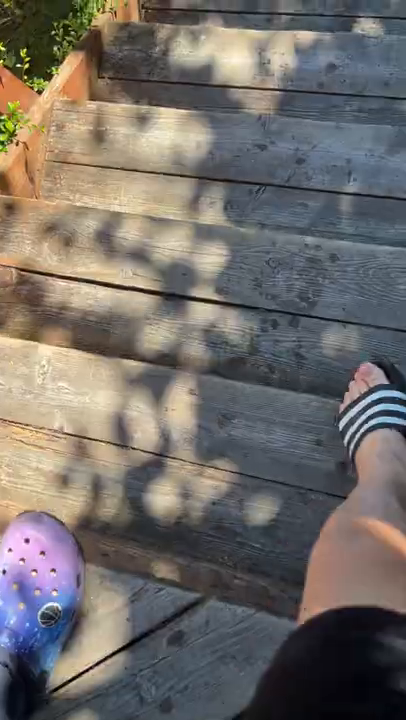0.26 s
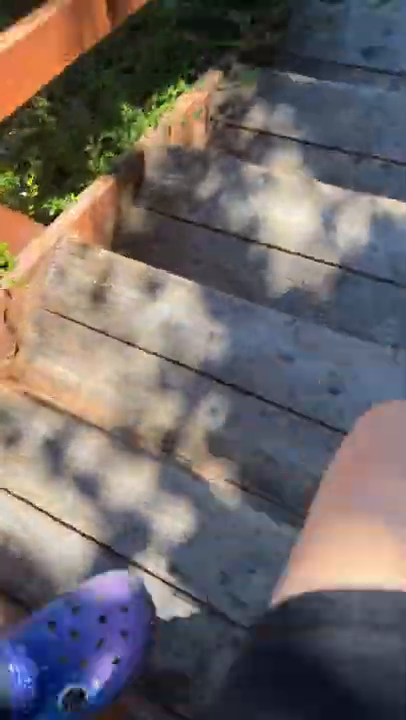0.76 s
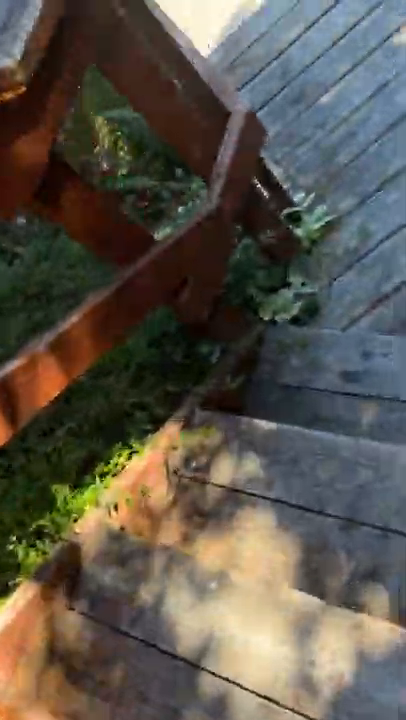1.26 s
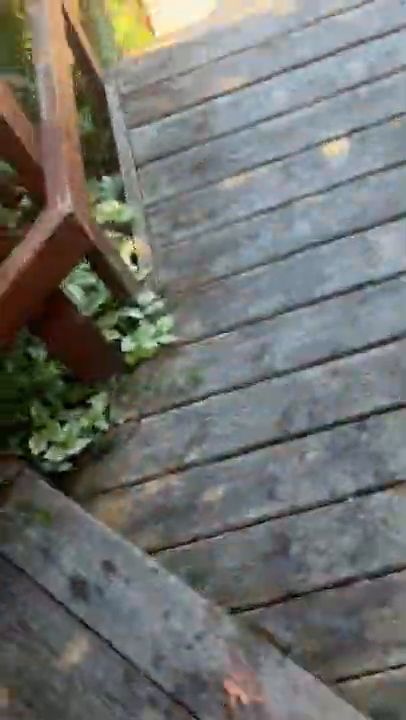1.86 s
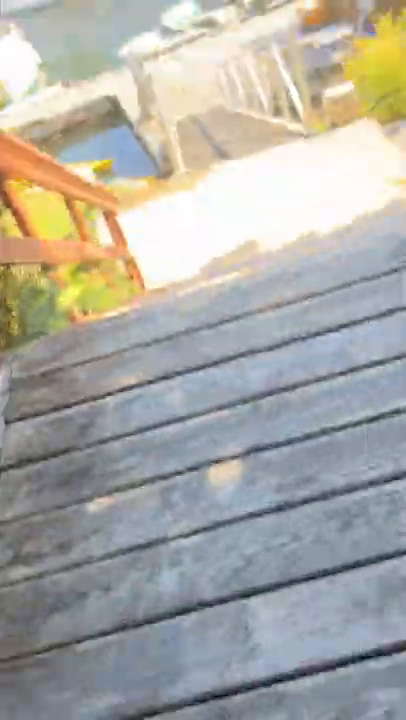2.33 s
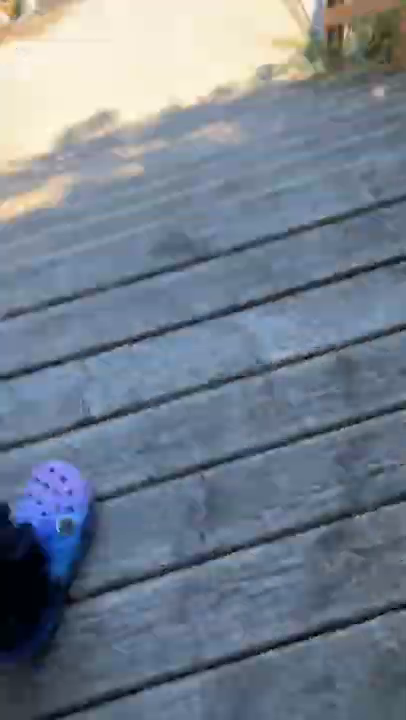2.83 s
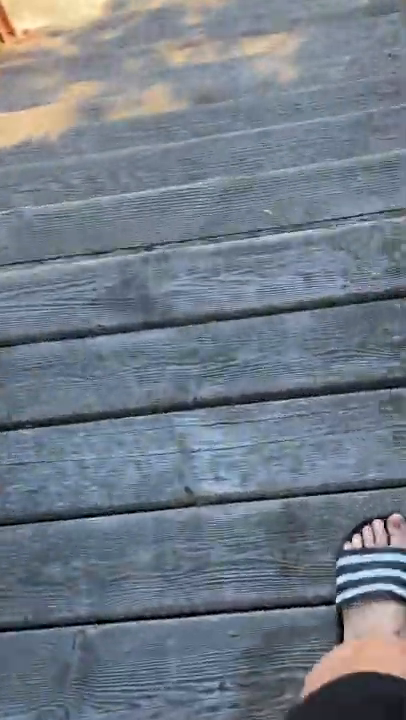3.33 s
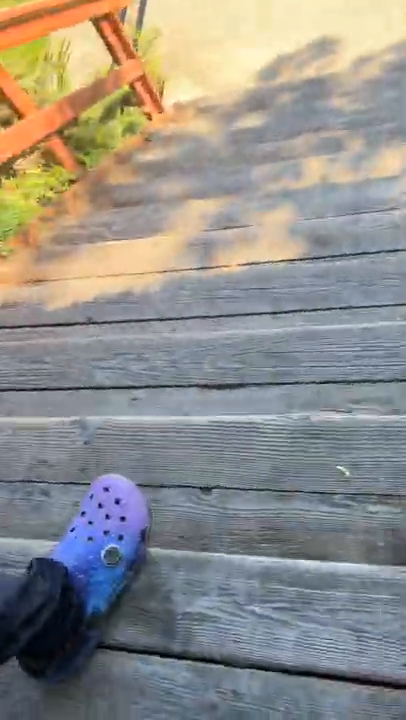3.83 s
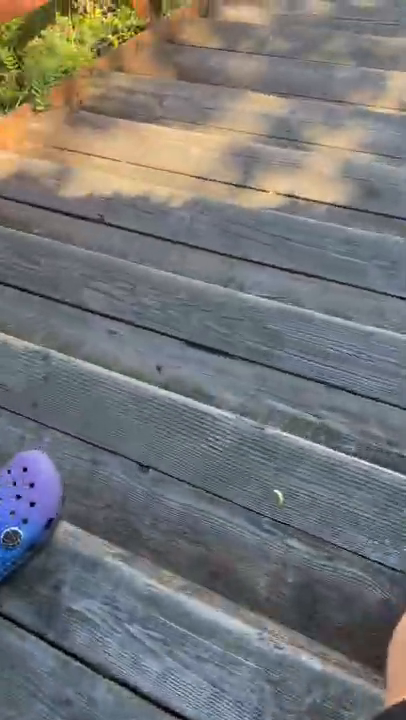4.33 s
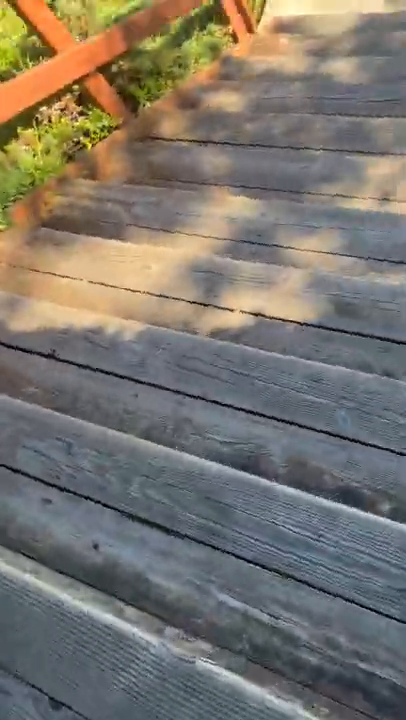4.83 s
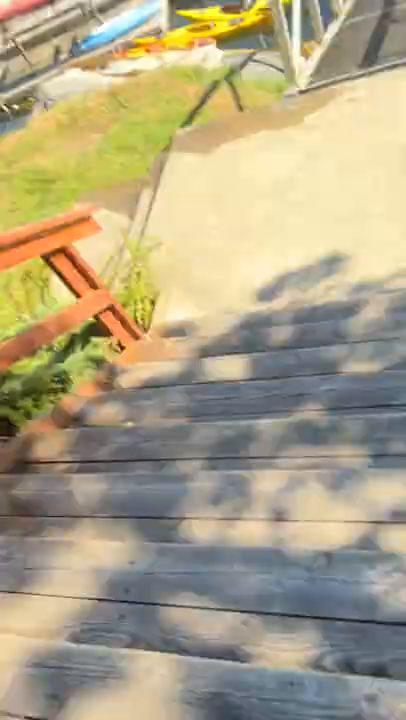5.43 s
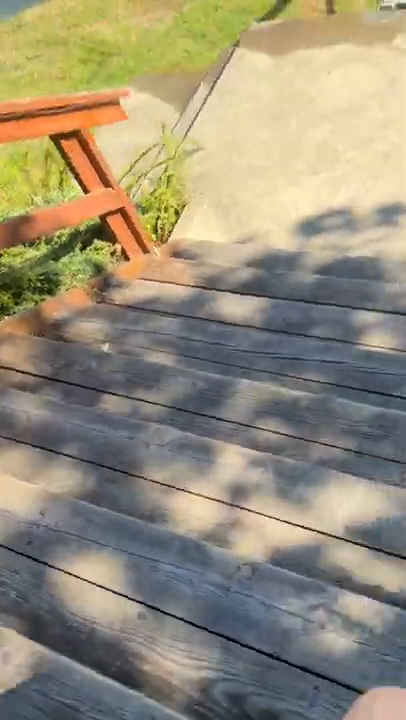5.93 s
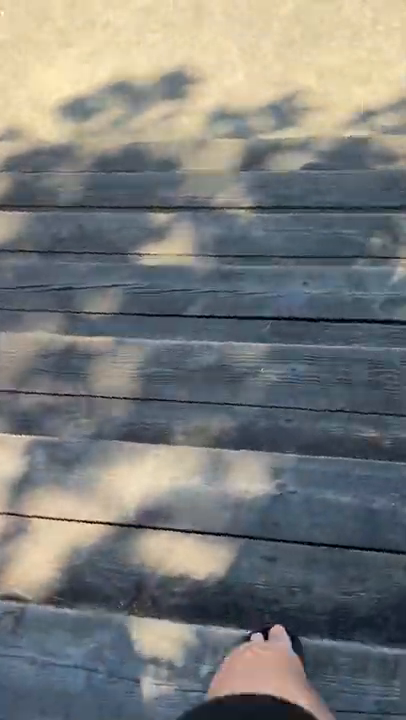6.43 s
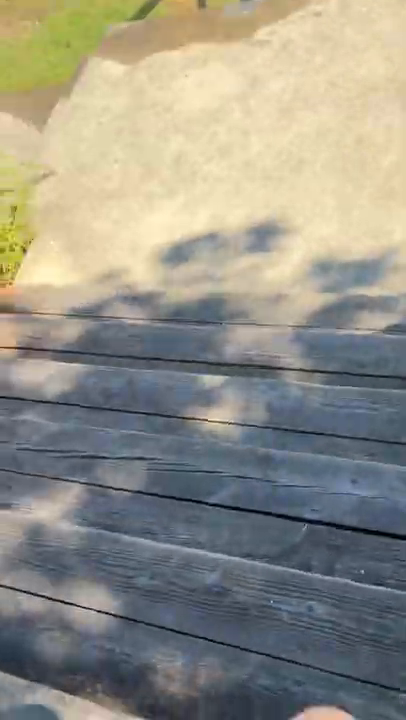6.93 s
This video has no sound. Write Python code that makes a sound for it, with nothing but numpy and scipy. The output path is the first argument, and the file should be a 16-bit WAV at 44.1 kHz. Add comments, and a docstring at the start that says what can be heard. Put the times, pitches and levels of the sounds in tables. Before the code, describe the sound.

Close hand-held pickup of irregular footsteps on damped planks: toe, ball, then full landing, each a short knock and slap with a low thump beneath. Firm, gritty stair steps come first, then duller, lighter deck steps with scraping soles and more clothing rustle, a sparser moment, and finally hollow steps on a bouncier lower flight. The garden around is almost silent, with only a faint dull tail.

```python
"""Footsteps on wooden stairs, outdoors: two people in foam clogs and slide sandals go down one flight,
over a deck and down a second. A step rolls from toe to ball to full landing and settles; each touch rings
damped plank modes (knock) and face modes (slap), with a grit burst. Low frame modes boom under the weight
and rock on, longer in the springy lower flight. Filtered noise makes sole scuffs, clothes that rustle
close to the hand-held phone, and a quiet garden."""
import sys
import numpy as np
from scipy import signal
from scipy.fft import rfft, irfft, next_fast_len
from scipy.io import wavfile

SR = 44100
rng = np.random.default_rng(int(sys.argv[2]) if len(sys.argv) > 2 else 0)


def unload_audio(sound):
    """Save the sound as a 16-bit wav file, at the path given as the first command line argument."""
    columns = np.transpose(np.atleast_2d(sound))
    # keep every value between -1 and 1, then stretch to whole-number steps
    steps = np.round(np.clip(columns, -1, 1) * 32767)
    wavfile.write(sys.argv[1], SR, steps.astype(np.int16))


N = 317079
TIME_S = np.arange(N) / SR
AGE_S = np.arange(SR // 2) / SR  # time since a blow
LOWER_FLIGHT_S = 4.2  # start of the second flight

# Colour of slaps and sole rasp. Each row: frequency in Hz, gain in dB.
SLAP_COLOUR = [(400, -4.5), (700, -1), (1000, 1.5), (1500, 1.5), (2200, -3), (3300, -13), (5000, -24.5),
               (9000, -51)]
# Colour of grit and sole hiss. Each row: frequency in Hz, gain in dB.
GRIT_COLOUR = [(1200, -23), (3000, -3.5), (7500, -2.5), (10000, -7.5), (13000, -6.5), (16000, -11.5)]
# Rolling steps. Each row: landing in s, toe lead in s, ball lead in s, boom lag in s, knock pitch in Hz,
# knock in dB, slap in dB, grit in dB (before a common gain), toe slap in dB, ball knock in dB,
# boom pitch in Hz, boom in dB.
ROLLING_STEPS = [(0.398, 0.068, .028, -0.0057, 340, -16, -23, -41.5, -42, -21, 97, -24.5),
                 (0.622, 0.027, 0.017, 0.0039, 328, -10.5, -22, -26.5, -43, -33, 77, -23.5),
                 (0.951, 0.051, 0.027, 0.011, 306, -13.5, -21, -34.5, -40.5, -34, 77.7, -22),
                 (1.219, 0.032, 0.03, 0.0012, 390, -11.5, -22, -35.5, -40.5, -58, 87.7, -19.5),
                 (1.354, 0.047, 0.0089, 0.011, 251, -25, -43, -42.5, -46, -42, 95, -26.5),
                 (1.658, 0.1, 0.064, -0.016, 248, -21, -40, -48.5, -39.5, -29, 103.8, -24.5),
                 (2.009, 0.082, 0.056, .001, 217, -19, -33.5, -47.5, -38, -21, 123, -29),
                 (2.132, 0.02, 0.0091, 0.013, 280, -23.5, -32.5, -45, -42.5, -41, 87.2, -23),
                 (2.357, .069, .058, .000, 278, -22, -38.5, -49, -42, -21.5, 91, -34.5),
                 (2.459, .023, .020, .001, 283, -19.5, -29, -38, -30, -26.5, 119, -29),
                 (2.754, .021, .018, -.012, 210, -27, -42.5, -46.5, -35, -27, 127.5, -29.5),
                 (3.301, 0.079, 0.021, -0.006, 274, -23.5, -30.5, -38, -39, -35, 89.5, -25),
                 (3.865, 0.023, 0.012, 0.024, 271, -31.5, -36, -59, -55.5, -53.5, 69.7, -34),
                 (4.507, .086, .036, 0.0136, 392, -28, -45, -52.5, -45, -29.5, 65.1, -25),
                 (4.998, 0.049, .035, 0.025, 330, -22, -37, -57.5, -43, -33, 76.2, -25.5),
                 (5.224, .011, 0.006, 0.017, 417, -35.5, -35.5, -49, -41.5, -64, 68.4, -27.5),
                 (5.434, 0.081, 0.042, -0.021, 480, -24.5, -39, -60, -39.5, -25, 77, -27),
                 (5.864, .031, 0.016, 0.005, 236, -17.5, -32, -45, -36.5, -42, 93.7, -21),
                 (6.392, 0.068, 0.037, 0.019, 483, -19, -27, -44, -38, -28.5, 78, -22),
                 (6.848, .038, 0.037, .002, 250, -17, -30.5, -39.5, -40.5, -49, 97.7, -22.5)]
# Lone flat touches and dull thumps of the frame. Each row: start in s, knock in dB, boom in dB.
TOUCHES_AND_THUMPS = [(0.006, -37, -44), (1.138, -66, -29.5), (2.828, -31, -32.5), (2.939, -37, -50),
                      (3.11, -40.5, -54), (3.682, -25.5, -36), (5.573, -63, -33)]


def undb(db):
    """Decibels to gain."""
    return 10 ** (np.asarray(db) / 20)


def unit(x, span=slice(None)):
    """Each row scaled to rms 1 over a span of samples."""
    return x / np.sqrt(np.mean(x[..., span] ** 2, axis=-1, keepdims=True))


def blow(x):
    """A blow scaled to rms 1 over its first 20 ms."""
    return unit(x, slice(SR // 50))


def shape(points, size):
    """Gain of a (Hz, dB) curve at the bins of a transform."""
    hz, db = np.transpose(points)
    bins_hz = np.fft.rfftfreq(size, 1 / SR)
    return undb(np.interp(np.log(bins_hz + 1), np.log(hz), db))


def colour(x, points):
    """Causal filter with a (Hz, dB) response, built from its folded cepstrum."""
    size = 4096
    cepstrum = irfft(np.log(shape(points, size)))
    fold = np.r_[1, np.full(size // 2 - 1, 2), 1, np.zeros(size // 2 - 1)]
    impulse = irfft(np.exp(rfft(cepstrum * fold)))
    return signal.fftconvolve(x, impulse[None], axes=1)[:, :x.shape[1]]


def noise(size):
    """Two rows of noise: what the ports share and what differs between them."""
    return rng.standard_normal((2, size))


def walk(rate_hz, size):
    """A smooth random wander with a spread near 1."""
    knots = rng.standard_normal(int(size / SR * rate_hz) + 2)
    return np.interp(np.arange(size) / SR * rate_hz, np.arange(len(knots)), knots)


def fade(t60_s):
    """Exponential decay after a blow."""
    return np.exp(-np.log(1000) * AGE_S / t60_s)


def add(track, start_s, sound):
    """Mix a sound into the track at a time."""
    start = max(int(start_s * SR), 0)
    part = sound[:, :max(N - start, 0)]
    track[:, start:start + part.shape[1]] += part


def ring(hz, db, t60_s, rise_cycles):
    """Damped modes; slow bending waves make the low ones swell later than the high ones."""
    age_s = AGE_S[AGE_S < t60_s.max()]
    cycles = hz[:, None] * age_s
    swell = 1 - np.exp(-(cycles / rise_cycles) ** 2)
    waves = swell * np.exp(2j * np.pi * cycles - np.log(1000) * age_s / t60_s[:, None])
    phases = np.exp(2j * np.pi * rng.random((2, len(hz))))
    sound = ((undb(db) * phases) @ waves).imag
    return np.pad(sound, ((0, 0), (0, len(AGE_S) - len(age_s))))


def wood_t60(hz, at_1khz_s, slope):
    """Wood damps its high modes sooner."""
    return at_1khz_s * (hz / 1000) ** -slope


def scatter(lo_hz, hi_hz, count):
    """Random frequencies, one in each equal step of pitch."""
    return lo_hz * (hi_hz / lo_hz) ** ((np.arange(count) + rng.random(count)) / count)


def flight(s):
    """How the boards underfoot answer: the lower flight is springier and smoother."""
    # Each: settling knock in dB re landing, dB per rocking, sole rasp and sole hiss in dB before common gains.
    upper = (-25, -21.5, -47, -54)
    lower = (-10.5, -8, -48, -60.5)
    return lower if s > LOWER_FLIGHT_S else upper


def light_touch(s, pitch_hz, knock_db):
    """A light touch: slap and grit follow its knock, at less than dB for dB."""
    gain_db = 0.69 * (knock_db + 27.5)
    return s, pitch_hz, knock_db, -40 + gain_db, -51.5 + gain_db


def touches():
    """Every meeting of sole and plank, as (s, pitch Hz, knock dB, slap dB, grit dB before a common gain)."""
    for (s, toe_lead_s, ball_lead_s, _, pitch_hz, knock_db, slap_db, grit_db,
         toe_db, ball_db, _, _) in ROLLING_STEPS:
        # the toe lands bright however hard the step: its slap sets its knock and grit
        yield s - toe_lead_s, pitch_hz, toe_db + 3.5, toe_db, toe_db - 17
        yield light_touch(s - ball_lead_s, pitch_hz, ball_db)
        yield s, pitch_hz, knock_db, slap_db, grit_db
        # the sole flattens with a second, dull knock
        settle_db = knock_db + flight(s)[0]
        yield s + 0.036, pitch_hz, settle_db, settle_db - 20.5, settle_db - 32
    for s, knock_db, _ in TOUCHES_AND_THUMPS:
        yield s, 310, knock_db, knock_db - 9, knock_db - 22.5


def loads(count=3, rock_s=0.086, rock_pitch=0.87):
    """Weight comes onto the ball, then the whole foot, and the frame rocks: (s, pitch Hz, dB)."""
    for s, _, ball_lead_s, lag_s, _, knock_db, _, _, _, ball_db, pitch_hz, boom_db in ROLLING_STEPS:
        # the early boom drops by a share of how much softer the ball knocks, and is capped against it
        early_db = boom_db + 0.5 + 0.44 * (ball_db - knock_db)
        yield s - ball_lead_s - 0.0142, 99.1, min(early_db, ball_db + 2.5)
        for k in range(count):
            yield s + lag_s + k * rock_s, pitch_hz * rock_pitch ** k, boom_db + k * flight(s)[1]
    for s, _, boom_db in TOUCHES_AND_THUMPS:
        yield s, 68.6, boom_db


def rubs(after_s=0.025):
    """A sole rubs through its roll and just after, and sometimes drags or slaps briefly: (s, s, dB, dB)."""
    # Each row: start in s, length in s, rasp in dB, grit hiss in dB, both before common gains.
    drags_and_slaps = [(1.296, 0.044, -57, -45.5), (1.571, .1, -46, -44), (1.934, .022, -39.5, -47.5),
                       (2.135, 0.1, -46, -51), (2.436, 0.033, -34.5, -49), (2.762, 0.094, -39.5, -43.5),
                       (3.213, 0.082, -56, -44.5), (3.682, 0.058, -41, -44.5), (4.435, 0.031, -42.5, -57.5),
                       (5.25, .12, -51, -58.5), (6.412, 0.14, -51.5, -55.5), (6.883, 0.0256, -31.5, -59),
                       (6.944, 0.11, -49.5, -59)]
    rolls = [(s - toe_lead_s, toe_lead_s + after_s, *flight(s)[2:]) for s, toe_lead_s, *_ in ROLLING_STEPS]
    return rolls + drags_and_slaps


def tick(t60_s, tail_db, tail_t60_s):
    """Grit cracks under a sole, with a faint crunch after it."""
    envelope = fade(t60_s) + undb(tail_db) * fade(tail_t60_s)
    return blow(colour(noise(len(AGE_S)) * envelope, GRIT_COLOUR))


def crumb():
    """A tiny click of sand or strap, with a colour of its own."""
    hz = scatter(3000, 9000, count=1) * scatter(0.81, 2.5, count=18)
    return blow(ring(hz, np.zeros(len(hz)), np.full(len(hz), 0.018), rise_cycles=3.4))


def clack(tilt_db_per_octave=0, spread_db=2, tail_db=-17, tail_t60_s=0.054):
    """The crowded cross-grain modes of a plank's face, and their scatter into the boards around it."""
    hz = scatter(654.8, 5500, count=56)
    points_hz, points_db = np.transpose(SLAP_COLOUR)
    db = np.interp(np.log(hz), np.log(points_hz), points_db)
    db = db + 10 * np.log10(hz / hz[0])  # higher modes stand for wider bands
    db = db + tilt_db_per_octave * np.log2(hz / hz[0])
    db = db + spread_db * rng.standard_normal(len(hz))
    face = blow(ring(hz, db, wood_t60(hz, at_1khz_s=0.054, slope=0.22), rise_cycles=0.29))
    tail = blow(colour(noise(len(AGE_S)) * fade(tail_t60_s), SLAP_COLOUR))
    return face + undb(tail_db) * tail


def background(garden_db=-58, rumble_db=-54):
    """Quiet garden air, and a low rumble, as wandering filtered noise."""
    # Each row: frequency in Hz, gain in dB.
    garden_colour = [(20, -21), (60, -4.5), (200, -10), (400, -16), (700, -34), (1500, -27.5),
                     (3000, -39.5), (8000, -43), (13000, -44.5), (16000, -37.5)]
    rumble_colour = [(25, -22.5), (65, -5.0), (110, -6.5), (200, -21.5), (2000, -99)]
    air = unit(colour(noise(N), garden_colour)) * undb(garden_db + 0.82 * walk(3, N))
    rumble = unit(colour(noise(N), rumble_colour)) * undb(rumble_db + 2.5 * walk(21, N))
    return air + rumble


def clothes(gain_db=5, crinkle_db=3.5, stir_db=3.2):
    """Fabric rubs unevenly as the legs swing; its dull and its bright parts stir separately."""
    # Each row: frequency in Hz, gain in dB.
    rustle_colour = [(200, -14), (500, 4.5), (1400, 1), (3000, -7.5), (5500, -9.5), (10000, -13.5),
                     (13000, -8.5), (16000, -18.5)]
    # Each row: time in s, rustle level in dB before gain_db.
    swing = [(0.0, -65.5), (1.98, -61.5), (2.34, -59.5), (2.46, -64), (3.8, -68), (4.12, -81.5),
             (4.64, -72.5), (5.04, -78.5), (5.35, -69.5), (6.65, -67), (7.19, -70.5)]
    cloth = unit(colour(noise(N), rustle_colour))
    dull = signal.sosfilt(signal.butter(1, 2500, fs=SR, output="sos"), cloth)
    folds = np.zeros((2, N))
    for part in (dull, cloth - dull):
        folds += part * undb(crinkle_db * walk(170, N) + stir_db * walk(15, N))
    return folds * undb(np.interp(TIME_S, *np.transpose(swing)) + gain_db)


def surroundings(x, t60_s=0.35, wet_db=-21):
    """Rails, treads and the space under the deck scatter a faint, dull tail."""
    tail = noise(len(AGE_S)) * fade(t60_s) * (1 - np.exp(-AGE_S / 0.026))
    tail = tail / np.sqrt(np.sum(tail ** 2) / 2)
    tail = colour(tail, [(60, 8.5), (200, 6), (600, -5), (2000, 1.0), (6000, 4.5), (15000, 1.5)])
    return undb(wet_db) * signal.fftconvolve(x[:1], tail, axes=1)[:, :N]


def scuffs(catch_db=5, catches_per_s=300, press_db=1.5, presses_per_s=55, rasp_gain_db=-1, hiss_gain_db=-2):
    """Soles catch and slip on the weathered grain; loose sandals snap against the foot."""
    # Each row: frequency in Hz, gain in dB.
    groan_colour = [(90, -20.5), (280, -4.5), (500, -1), (1500, -41)]
    # Sandal and strap snaps. Each row: start in s, level in dB before a common gain.
    snaps = [(0.989, -37), (3.424, -48), (3.995, -44), (5.944, -40.5), (6.139, -48), (6.456, -42),
             (6.989, -40.5)]
    out = np.zeros((2, N))
    for s, length_s, rasp_db, hiss_db in rubs():
        size = int(np.clip(length_s, 0.01, 0.4) * SR)
        wander_db = catch_db * walk(catches_per_s, size) + press_db * walk(presses_per_s, size)
        grip = signal.windows.tukey(size, 0.5) * undb(wander_db)
        rasp = unit(colour(noise(size) * grip, SLAP_COLOUR))
        hiss = unit(colour(noise(size) * grip, GRIT_COLOUR))
        groan = unit(colour(noise(size) * grip, groan_colour))
        add(out, s, undb(rasp_db + rasp_gain_db) * (rasp + 1.45 * groan))
        add(out, s, undb(hiss_db + hiss_gain_db) * hiss)
    for s, db in snaps:
        snap = crumb() + tick(t60_s=0.031, tail_db=-20.5, tail_t60_s=0.07) + 0.5 * clack()
        add(out, s, undb(db - 10.5) * snap)
    return out


def sole_noises(lead_s=0.029, brush_db=-19, settle_db=-19, crumb_db=-11):
    """A sole brushes the wood just before it lands; as it flattens, the plank ticks and sand shifts."""
    out = np.zeros((2, N))
    swell = np.linspace(0, 1, int(lead_s * SR))
    for s, _, _, slap_db, grit_db in touches():
        brush = unit(colour(noise(len(swell)), SLAP_COLOUR)) * swell
        add(out, s - lead_s, undb(slap_db + brush_db) * brush)
        add(out, s + rng.uniform(0.006, 0.035), undb(slap_db + settle_db) * clack())
        for wait_s in rng.uniform(0, 0.031, size=2):
            add(out, s + wait_s, undb(min(grit_db, -42) + crumb_db) * crumb())
    return out


def thuds(reference_hz=74):
    """The frame booms as it takes a walker's weight; the deeper the span, the longer it rings."""
    # Joist and stringer modes. Each row: multiple of the pitch, level in dB, t60 in s at reference_hz.
    frame_modes = [(0.698, -4.5, 0.37), (0.998, -0.5, 0.32), (1.42, -4.5, 0.19), (1.9, -5.5, 0.14)]
    out = np.zeros((2, N))
    ratio, db, t60_s = np.transpose(frame_modes)
    for s, pitch_hz, level_db in loads():
        boom = ring(pitch_hz * ratio, db, t60_s * reference_hz / pitch_hz, rise_cycles=0.6)
        add(out, s, undb(level_db) * unit(boom, slice(SR // 25)))  # rms over the first 40 ms
    return out


def contacts(focus_db_per_octave=7, detune=0.09, grit_gain_db=-1, tread_hz=850, tread_db=3.5):
    """A touch rings the plank underfoot and its neighbour; the spot and the sole decide which modes lead."""
    # Bending modes of a plank, in Hz before detuning.
    plank_hz = np.array([147, 191.4, 238.4, 291.4, 352.9, 432.4, 522.6, 587.2, 696.7, 832, 1036])
    out = np.zeros((2, N))
    for s, pitch_hz, knock_db, slap_db, grit_db in touches():
        hz = (plank_hz * np.exp(detune * rng.standard_normal((2, len(plank_hz))))).ravel()
        modes_db = -focus_db_per_octave * abs(np.log2(hz / pitch_hz))
        if s > LOWER_FLIGHT_S:  # these treads ring higher and hollower
            modes_db = modes_db + tread_db * np.exp(-(np.log2(hz / tread_hz) / 0.5) ** 2)
        knock = blow(ring(hz, modes_db, wood_t60(hz, at_1khz_s=0.055, slope=0.62), rise_cycles=0.93))
        # a gritty landing is brighter
        slap = clack(tilt_db_per_octave=0.34 * (grit_db - slap_db + 12.5))
        grit = tick(t60_s=0.037, tail_db=-14.5, tail_t60_s=0.084)
        add(out, s, undb(knock_db) * knock + undb(slap_db) * slap + undb(grit_db + grit_gain_db) * grit)
    return out


def scene(port_lag_s=0.000149):
    """All sounds reach two ports; the left port lags the right by a fixed time for every sound."""
    # Sound that differs between the ports. Each row: frequency in Hz, level in dB re the common sound.
    diffuse = [(60, -14.5), (300, -14.5), (600, -4), (1200, -2), (5500, 2), (7500, -1.5), (9500, -26.5),
               (16000, -25)]
    # Each row: frequency in Hz, left minus right in dB.
    port_balance = [(60, -0.5), (200, -1), (700, -4), (1300, -2), (4400, 2.5), (15000, -0.5)]
    steps = contacts() + thuds() + sole_noises() + scuffs()
    mix = steps + surroundings(steps) + clothes() + background()
    size = next_fast_len(N + SR // 10)
    common, apart = rfft(mix, size)
    share = shape(diffuse, size)
    tilt = np.sqrt(shape(port_balance, size))  # half of the balance for each port
    lag = np.exp(-2j * np.pi * np.fft.rfftfreq(size, 1 / SR) * port_lag_s)
    left = (common + share * apart) * tilt * lag
    right = (common - share * apart) / tilt
    return irfft(np.array([left, right]) / np.sqrt(1 + share ** 2), size)[:, :N]


def record(dry, bass_hz=40, top_hz=15900):
    """The phone sheds the deepest bass, rounds the highest peaks and cuts the top."""
    lean = signal.sosfilt(signal.butter(3, bass_hz, "high", fs=SR, output="sos"), dry)
    rounded = lean / (1 + lean ** 6) ** (1 / 6)
    return signal.sosfilt(signal.ellip(8, 0.2, 70, top_hz, fs=SR, output="sos"), rounded)


dry = scene()
out = record(dry)
unload_audio(out)
```